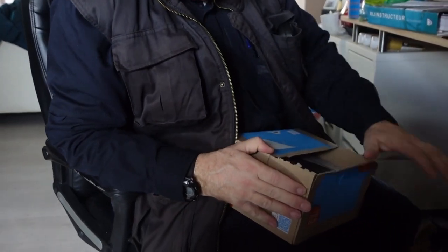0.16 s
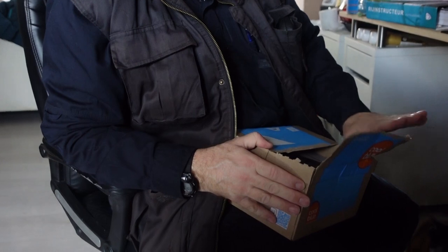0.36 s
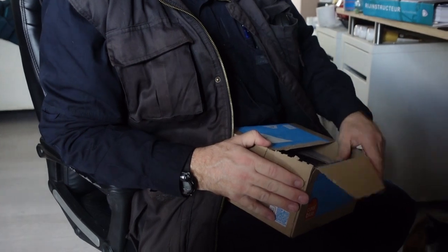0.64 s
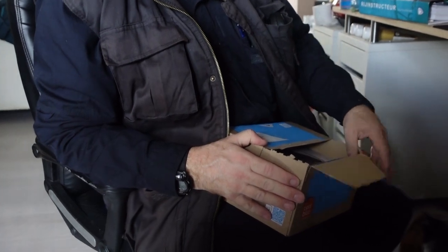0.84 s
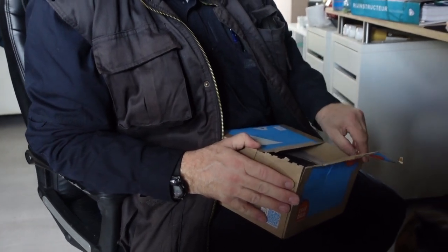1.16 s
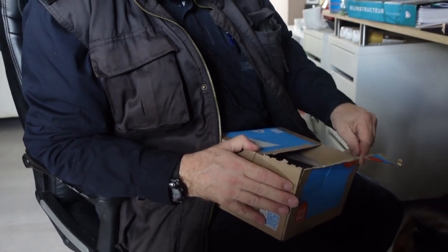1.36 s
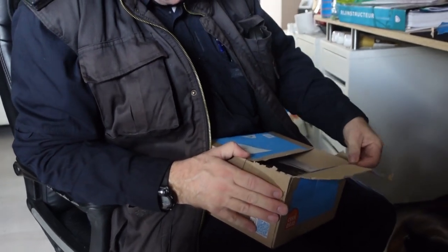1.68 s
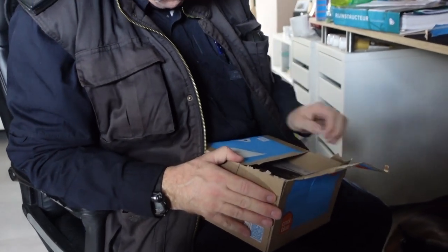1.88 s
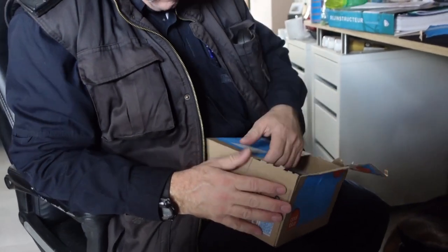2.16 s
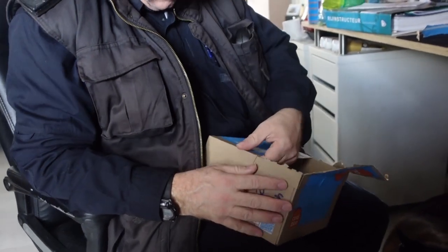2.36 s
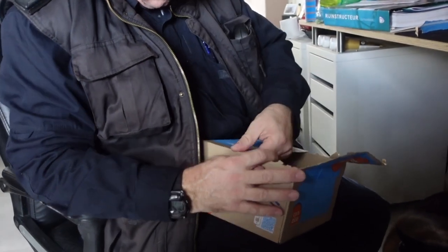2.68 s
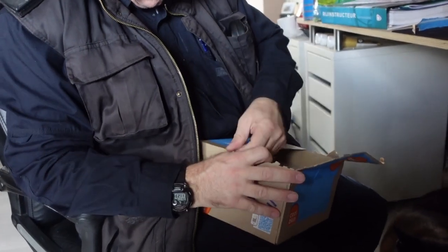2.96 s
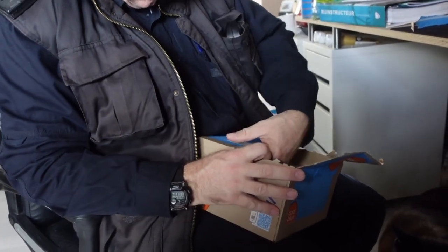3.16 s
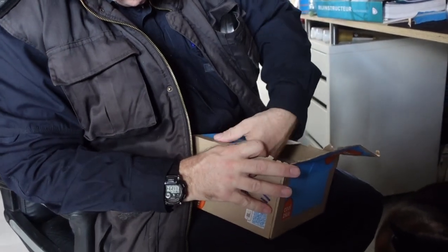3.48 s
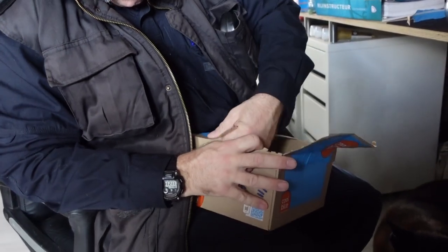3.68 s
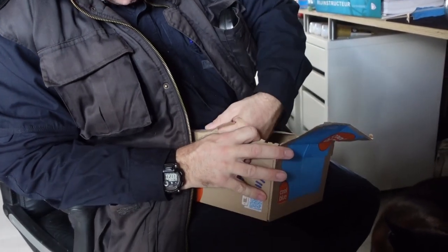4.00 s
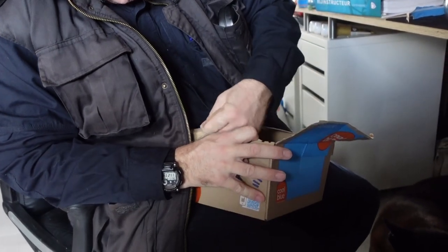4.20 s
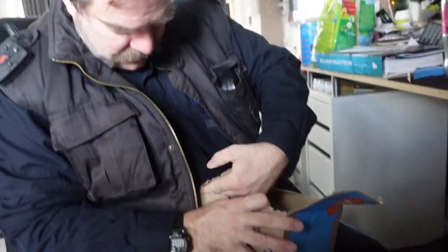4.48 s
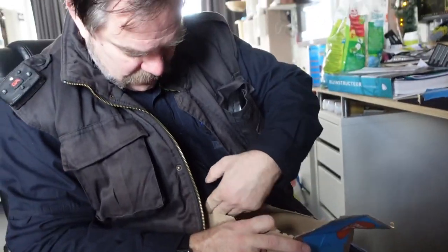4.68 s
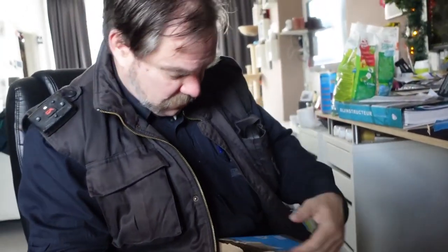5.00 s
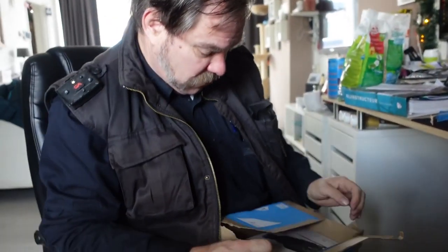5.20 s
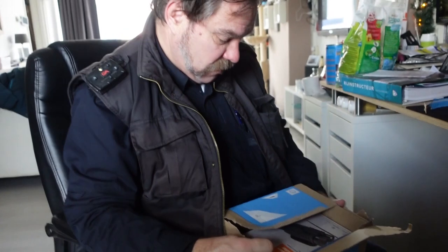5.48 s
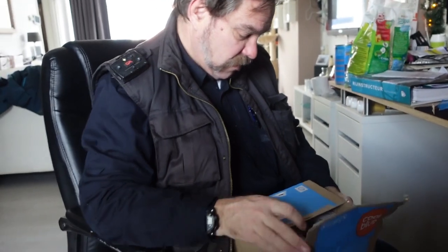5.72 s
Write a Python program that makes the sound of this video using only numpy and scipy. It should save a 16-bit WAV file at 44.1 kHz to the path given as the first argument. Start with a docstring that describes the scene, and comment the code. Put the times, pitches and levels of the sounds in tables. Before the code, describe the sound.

Close stereo sound of stiff cardboard being opened by hand indoors. Irregular papery rubs come and go, broken by bright flap snaps, short edge rasps, fine fibre crackles and muffled hollow thuds. The strongest hits come just before halfway and again about two thirds through, followed by gentler scuffing. The box sits slightly right of centre, with little echo and a faint steady room hiss.

```python
"""A cardboard box is opened on the lap in a small furnished room, close to a stereo microphone.
Over faint room air, hands and sleeves rub the board from the start, and edges soon rasp past each other.
Tiny fibres tick and soft bumps sound the hollow from about 0.3 s; flaps snap and knock from 0.6 s.
Rubs are trains of random slips, blows are bursts of noise; filters ring them as panels and hollow."""
import sys
import numpy as np
from scipy import signal
from scipy.fft import rfft, irfft
from scipy.io import wavfile
from scipy.ndimage import uniform_filter1d, minimum_filter1d

SR = 44100
rng = np.random.default_rng(int(sys.argv[2]) if len(sys.argv) > 2 else 0)


def file_out(sig):
    """Save sig as 16-bit WAV at sys.argv[1]."""
    # one column per channel
    cols = np.atleast_2d(sig).T
    # limit, then scale
    lim = np.clip(cols, -1, 1)
    pcm = np.round(lim * 32767).astype(np.int16)
    wavfile.write(sys.argv[1], SR, pcm)


N = 257984
TIME = np.arange(N) / SR  # seconds


def undb(db):
    """Decibels to amplitude gain."""
    return 10 ** (np.asarray(db) / 20)


def unit(x):
    """Scale to unit energy."""
    return x / np.sqrt(np.sum(x ** 2) + 1e-18)


def through(x, response):
    """Pass a sound through an impulse response."""
    return signal.fftconvolve(x, response)[:len(x)]


def add(track, start_s, sound):
    """Mix a sound into the track from a given time."""
    i = max(int(start_s * SR), 0)
    track[i:i + len(sound)] += sound[:max(N - i, 0)]


def colour(points, modes=(), size=4096):
    """Minimum-phase, unit-energy response: a broad (Hz, dB) shape with (Hz, width Hz, dB) resonances."""
    f = np.fft.rfftfreq(size, 1 / SR) + 1  # the 1 Hz offset keeps the logarithm finite
    hz, db = np.transpose(points)
    gain = undb(np.interp(np.log(f), np.log(hz), db))
    resonant_power = sum(undb(2 * mode_db) / (1 + (2 * (f - centre) / width) ** 2)
                         for centre, width, mode_db in modes)
    gain = gain * np.sqrt(1 + resonant_power)
    # folding the cepstrum forward puts the energy as early as it can be
    cepstrum = irfft(np.log(gain))
    cepstrum[1:size // 2] *= 2
    cepstrum[size // 2 + 1:] = 0
    return unit(irfft(np.exp(rfft(cepstrum))))


def judder(per_s):
    """Random wobble with a spread near 1: straight lines between normal draws."""
    knots = rng.standard_normal(N // 20)
    return np.interp(TIME * per_s, np.arange(len(knots)), knots)


def wander(x, per_s, ring_s, count=6):
    """Drift between short, dense rings, so the colour shifts but favours no pitch for long."""
    t = TIME[:2048]
    weights = np.array([np.exp(judder(per_s)) for _ in range(count)])
    weights /= np.sqrt(np.sum(weights ** 2, axis=0))
    decay = np.exp(-np.log(1000) * t / ring_s)  # 60 dB down after ring_s
    rings = rfft(rng.standard_normal((count, len(t))) * decay)
    # level the rings' average power at every frequency
    rings /= np.sqrt(np.mean(np.abs(rings) ** 2, axis=0))
    return sum(through(x * weight, ring) for weight, ring in zip(weights, irfft(rings)))


def slips(per_s, spread_db):
    """Stick-slip force: random small releases with a few large ones among them, local rms near 1."""
    size = undb(spread_db * np.minimum(rng.exponential(size=N), 6))
    force = (rng.random(N) < per_s / SR) * size * rng.choice([-1, 1], N)
    local_power = np.abs(uniform_filter1d(force ** 2, size=2048))
    return force / np.sqrt(local_power + 1e-9)


# Resonances of the box. Each row: frequency in Hz, width in Hz, level in dB over the broad response.
BOX_MODES = [(273, 31, -10), (420, 25, 1), (487, 18, -14.5), (649, 72, 4.5), (960, 110, -1),
             (1320, 17, -23.5), (1412, 9.3, 4.5), (1640, 57, -23.5), (2010, 61, -15), (2370, 67, -5),
             (2990, 100, 8), (3350, 79, 5.5), (3340, 60, 3), (3920, 330, 1.5), (5340, 200, 3),
             (5900, 140, -17), (6600, 210, -4)]


def board(ring_hz, hollow_db, clack_db, edge_db, ring_db=9):
    """Response of the box to one contact: the touched flap rings; the spot weights each register."""
    low = [(30, hollow_db - 48), (110, hollow_db - 22), (200, hollow_db - 19), (320, hollow_db),
           (540, hollow_db - 2.0), (790, hollow_db / 2 - 4)]
    middle = [(1280, 3.2), (1950, 3.7), (3200, clack_db), (4600, clack_db - 1.0)]
    high = [(7000, edge_db + 6.5), (11000, edge_db + 2.0), (16000, edge_db - 11.5)]
    ring_width_hz = 0.13 * ring_hz
    return colour(low + middle + high, list(BOX_MODES) + [(ring_hz, ring_width_hz, ring_db)])


def blow(response, db, crush, contact_s):
    """One contact: a sharp release, then a brief crush of the flutes, levelled as rms over 10 ms."""
    t = TIME[:4096]
    force = crush * unit(rng.standard_normal(len(t)) * np.exp(-t / max(contact_s, 1e-4)))
    force[0] += 1
    return unit(through(force, response)) * undb(db) * np.sqrt(SR / 100)


# Spectrum of the still room. Each row: frequency in Hz, relative level in dB per Hz.
AIR_SPECTRUM = [(25, -29), (130, -15), (300, -11.5), (1000, -3), (1600, 3), (2900, 0.5), (5000, -5.5),
                (9000, -9), (16000, -34)]


def air(level_db=-53):
    """Faint steady background of the room: shaped noise."""
    return undb(level_db) * through(rng.standard_normal(N), colour(AIR_SPECTRUM))


# Strokes of a hand, sleeve or flap over the board. Each row: fastest moment in seconds, swell in seconds,
# fade in seconds, panel level in dB, hollow in dB and dry hiss in dB, both relative to that level;
# rubbing() trims the voices afterwards.
STROKES = [(0.005, 0.055, 0.054, -32, -18, -3), (0.25, 0.31, 0.32, -47, -21, -2),
           (0.55, 0.058, 0.038, -41.5, -1.5, -2), (0.69, 0.054, 0.15, -35.5, -17.5, 1),
           (0.82, 0.049, .07, -36.5, -17.5, -4), (0.949, 0.1, 0.082, -36, -17, -5),
           (1.34, 0.031, 0.18, -45.5, -11, -1.5), (1.59, 0.1, 0.09, -42.5, -14, 2.5),
           (1.8, .05, 0.045, -55, -25, 5), (2.22, 0.045, 0.049, -40, -16, -5.5),
           (2.3, 0.087, 0.093, -39, -5.5, -4), (2.61, 0.081, 0.098, -40.5, -3, -2),
           (2.75, 0.1, 0.16, -45.5, 1, -2), (3.12, 0.023, 0.03, -37, -2.5, -1.5),
           (3.23, 0.081, 0.05, -44, -9, -3.5), (3.42, 0.059, 0.054, -43.5, -9.5, -3),
           (3.635, 0.014, 0.016, -40, -11.5, -2), (3.72, 0.058, 0.054, -42.5, -22, 5.5),
           (3.85, 0.063, 0.062, -44.5, -10.5, 5), (4.04, .07, .08, -59.5, -24, 9.5),
           (4.185, 0.043, 0.054, -33.5, -18.5, 3), (4.31, 0.048, 0.062, -31, -16, -0.5),
           (4.59, 0.13, 0.25, -47.5, -5, -6.5), (4.735, 0.066, 0.084, -37.5, -10, -5.5),
           (5.021, 0.077, 0.067, -33.5, -15, -3), (5.22, .04, 0.037, -39, 4, 3),
           (5.43, 0.18, 0.16, -42.5, -11.5, 1.5), (5.78, 0.13, 0.34, -42.5, -12, -7)]
# The holding hand never lies quite still. One row: level in dB, then hollow and dry hiss in dB relative to it.
GRIP = (-55, -8, -1.6)


def effort(drop_db=9, roundness=1.7):
    """Strokes swell and fade over the steady grip; gives the drive of panels, hollow and hiss."""
    def voice_power(db, hollow_db, hiss_db):
        """Power of panels, hollow and hiss, one row each."""
        return undb(db + np.array([[0], [hollow_db], [hiss_db]])) ** 2

    power = voice_power(*GRIP)
    for peak_s, swell_s, fade_s, *levels in STROKES:
        away = np.minimum(np.abs(TIME - peak_s) / np.where(TIME < peak_s, swell_s, fade_s), 10)
        # drop_db is the fall over one swell or fade time; roundness 1 is pointed, 2 a bell
        swell = undb(-drop_db * away ** roundness)
        power = power + voice_power(*levels) * swell ** 2
    return np.sqrt(power)


# How unevenly the surfaces catch. Each row: time in seconds, spread of slip sizes in dB.
CATCH = [(0, 3.5), (.55, 0.5), (.7, 4.5), (.95, 1.5), (3.5, 1.5), (3.7, 5), (4.3, 4), (4.6, 2.5),
         (5.85, -0.5)]
# Rubbed board, the hollow's voice. Each row: frequency in Hz, relative level in dB.
HOLLOW_SHAPE = [(30, -29), (100, -22), (170, -10.5), (310, 3.5), (420, 2), (700, -6), (1100, 3.5),
                (3000, -51)]
# Rubbed board, the panels' voice. Each row: frequency in Hz, relative level in dB.
PANEL_SHAPE = [(300, -23.5), (650, -16), (1000, -8), (1400, 2), (1750, 3), (2200, 4.5), (2800, 3),
               (4200, 2.5), (6500, -9), (14000, -47)]
# Rubbed board, the paper face's hiss. Each row: frequency in Hz, relative level in dB.
HISS_SHAPE = [(200, -68), (2000, -31), (4200, 1.5), (5600, 7.5), (8500, 4.5), (12000, -2), (16000, -9)]


def rubbing(depth_db=1.72, hollow_trim_db=-2.5, panel_trim_db=1.0, damping_db=-5):
    """Sliding contact: slips shake the hollow and the panels, finer ones hiss off the paper face."""
    on_panel, on_hollow, on_face = effort() * undb(depth_db * judder(90))
    spread_db = np.interp(TIME, *np.transpose(CATCH))
    coarse, fine = slips(3000, spread_db), slips(9000, spread_db)
    # a hand lying on the board weakens its low resonances and stops the high ones
    damped = [(hz, width, mode_db + damping_db) for hz, width, mode_db in BOX_MODES if hz < 2100]
    # each spot that the hand travels over stirs its own panel modes
    hollow_force = slips(1500, 2.35) * on_hollow * undb(hollow_trim_db)
    hollow = through(wander(hollow_force, 14, 0.022), colour(HOLLOW_SHAPE, BOX_MODES))
    panel_force = coarse * on_panel * undb(panel_trim_db)
    panel = through(wander(panel_force, 20, 0.017, count=9), colour(PANEL_SHAPE, damped))
    hiss = through(fine * on_face, colour(HISS_SHAPE))
    return hollow + panel + hiss


# A flap or finger catches and drags. Each row: start in seconds, swell in seconds, fade in seconds,
# level in dB, flap ring in Hz, then hollow, clack and edge in dB relative to the panel tone.
DRAGS = [(0.019, 0.0041, 0.01, -31.5, 3520, -19, 1, 1), (0.369, 0.021, 0.0077, -31.5, 1310, -4, -2, -13.5),
         (0.426, .002, .006, -32, 1280, -17, 3, -11), (0.629, .003, 0.023, -31.5, 1260, -13, -16, -20),
         (0.939, .002, 0.011, -30, 1780, -36, -4, -24), (1.28, 0.01, 0.013, -26.5, 2110, -14, -0.5, -10.5),
         (1.343, .01, 0.0065, -33, 1400, -34, 2, -11), (1.39, .0065, 0.027, -24.5, 3350, -1.5, -2, -6.5),
         (1.807, .0065, 0.014, -40.5, 2440, -24, 4, -12), (2.241, 0.056, 0.033, -33, 840, -0.5, -15, -20),
         (2.828, 0.036, 0.0093, -35.5, 6500, -16, -4, -7), (2.881, 0.017, 0.038, -15, 5530, -8, -1, -6.5),
         (3.243, 0.0042, 0.013, -26.5, 1640, -5, 2, -15), (3.668, 0.027, 0.059, -33.5, 8600, -11, -2, 11),
         (3.822, .016, 0.014, -32, 6300, 2, 0, 3), (4.242, 0.0055, 0.022, -21.5, 1490, 1.5, 2.5, -3.5),
         (4.2842, 0.0045, 0.012, -18.5, 6000, 7, -1.5, -3.5), (4.3, 0.022, 0.0032, -13, 2230, -16, -1, -8),
         (4.298, 0.034, 0.028, -30, 405, -0.5, -8, -17), (5.189, 0.046, 0.017, -31, 386, -2, -11, -26),
         (5.689, .003, 0.028, -34.5, 2100, -5, -8, -19), (5.731, 0.0056, 0.018, -35, 1570, -5.5, -18, -26)]


def drags(lead_db=9):
    """An edge rasps over its neighbour: the force swells, then dies as the flap comes free."""
    out = np.zeros(N)
    rasp = slips(7000, 2.07) * undb(0.45 * judder(300))
    for start_s, swell_s, fade_s, db, *tone in DRAGS:
        first = int(start_s * SR)
        span = slice(first, first + SR // 2)
        t = TIME[span] - start_s
        swell = undb(lead_db * np.minimum(t / swell_s - 1, 0))  # climbs by lead_db
        fade = np.exp(-np.maximum(t - swell_s, 0) / fade_s)
        add(out, start_s, through(rasp[span] * swell * fade, board(*tone)) * undb(db))
    return out


# Fibres cracking. Each row: start in seconds, level in dB, pitch in Hz.
CRACKS = [(0.2587, -32.5, 8300), (0.287, -44, 12800), (0.299, -35, 7800), (0.4737, -41, 7300),
          (0.4956, -31.5, 7660), (0.5798, -37, 10900), (0.5837, -39, 10100), (2.335, -37.5, 7400),
          (3.6323, -34.5, 5600), (3.6442, -38, 7700), (3.724, -34, 8500), (3.7441, -35, 8700),
          (3.775, -38, 7700), (3.793, -32, 7840), (3.8108, -31, 7960), (3.836, -28.5, 7000),
          (3.8396, -29.5, 7800), (4.0196, -42, 9700), (4.026, -44, 9050)]
# A fold is under strain and sheds fainter cracks. Each row: start in seconds, end in seconds.
STRAINS = [(0.311, 0.37), (3.68, 3.96)]


def cracks(splinter=0.61, splinter_s=0.00051, strain_per_s=35, strain_db=-44, scatter_db=5, strain_hz=8240):
    """Single fibres break with a bright tick that bypasses the box resonances."""
    faint = []
    for start_s, end_s in STRAINS:
        count = int((end_s - start_s) * strain_per_s) + 1
        for place, size in rng.random((count, 2)):
            crack_s = start_s + (end_s - start_s) * place
            faint.append((crack_s, strain_db + scatter_db * (2 * size - 1), strain_hz))
    out = np.zeros(N)
    for start_s, db, hz in list(CRACKS) + faint:
        shape = [(hz / 90, -52), (hz / 8, -27), (hz * 0.54, -15), (hz * 0.8, -1), (hz, 0), (hz * 1.65, -11)]
        add(out, start_s, blow(colour(shape), db, splinter, splinter_s))
    return out


# Soft bumps of fingers and knees, which mostly sound the hollow. Each row: start in seconds,
# level in dB, wall ring in Hz, contact time in seconds.
BUMPS = [(0.301, -49, 553, 0.0096), (2.161, -46.5, 940, 0.0012), (2.677, -38, 930, 0.0025),
         (4.172, -42.5, 350, .012), (4.2, -41, 353, .012), (4.528, -49, 470, 0.0088),
         (4.757, -43, 340, 0.0061), (4.807, -50.5, 420, .004), (4.986, -41, 423, .008),
         (5.12, -42, 430, 0.011), (5.356, -43.5, 620, 0.0067), (5.786, -45, 450, 0.0018)]


def bumps(crush=2.5, hollow_db=11, clack_db=-7, edge_db=-17):
    """Soft contacts share one dull balance of registers; only the wall ring differs in pitch."""
    out = np.zeros(N)
    for start_s, db, ring_hz, contact_s in BUMPS:
        response = board(ring_hz, hollow_db, clack_db, edge_db)
        add(out, start_s, blow(response, db, crush, contact_s))
    return out


# Flaps snapping and knocking. Each row: start in seconds, level in dB, flap ring in Hz, then hollow,
# clack and edge in dB relative to the panel tone, contact time in seconds.
KNOCKS = [(0.6111, -21.5, 1290, -11, -1, -15, 0.01), (0.6187, -21, 1420, -11, -10, -29, 0.0035),
          (0.6273, -21, 1065, -5.5, -5, -20.5, .007), (0.7293, -31.5, 4500, -21, 12, 4, 0.0018),
          (0.7606, -23, 1130, -11, -10.5, -19, 0.00061), (0.8298, -17, 1860, -17, 1, -11, 0.0025),
          (0.9035, -33, 2940, -20, 9, 0, 0.0009), (1.286, -28.5, 2220, -6, 1.5, -19, 0.0074),
          (1.3815, -16.5, 1950, -29, 3, -18, 0.002), (1.3845, -17, 1340, -17, -7, -15, 0.003),
          (1.3888, -18, 3340, -8, 4, -11, 0.0067), (2.5019, -21.5, 2970, -7, 2.5, 5.5, 0.0016),
          (2.5125, -27.5, 1780, -3, 3, -1, 0.0074), (2.8806, -10, 4460, -26, 0, -7.5, 0.0023),
          (3.5336, -41, 1590, -35, -4, -33, 0.0035), (4.152, -22, 2940, -7.5, 7, -4.5, .0024),
          (4.3047, -22, 2140, -4, -3, -17, 0.0023), (4.3202, -14, 2300, 0.5, 9, -11, 0.0037),
          (5.1733, -32.5, 4670, 0, -0.5, -8, .008), (5.8391, -25, 1580, -8, 4, -17, 0.0051)]


def knocks(crush=1.85):
    """Flaps snap free or strike the box and ring it."""
    out = np.zeros(N)
    for start_s, db, *tone, contact_s in KNOCKS:
        add(out, start_s, blow(board(*tone), db, crush, contact_s))
    return out


def radiate(x, corner_hz=125):
    """Small panels move too little air to give off deep bass."""
    return signal.sosfilt(signal.butter(2, corner_hz, "high", fs=SR, output="sos"), x)


def reflections(t60_s, gap_s):
    """Scattered echoes from body, desk and walls: decaying noise after a short gap."""
    t = TIME[:SR // 2]
    echoes = rng.standard_normal(len(t)) * undb(-60 * t / t60_s) * (t > gap_s)
    tone = colour([(100, 4.0), (1500, 1.0), (5000, -2.0), (9000, -1), (16000, 1)])
    return unit(through(echoes, tone))


def rumble(level_db=-90):
    """A very faint low rumble: noise weighted to the bass."""
    shape = colour([(25, 13), (80, 6), (300, -20), (2000, -50)])
    return undb(level_db) * through(rng.standard_normal(N), shape)


def scene(near_db=-15, room_db=-12.5, side_db=-19, side_room_db=-20):
    """The box sits a little right, near centre around 3.8 s; moving arms and room blur each contact."""
    box = radiate(rubbing() + drags() + cracks() + bumps() + knocks())
    mid = box + undb(near_db) * wander(box, 5.2, 0.039)
    mid += undb(room_db) * through(box, reflections(0.35, 0.006)) + air()
    side = undb(side_db) * wander(box, 5.5, 0.006)
    side += undb(side_room_db) * through(box, reflections(0.24, 0.006)) + 0.58 * air()
    # sound reaches the two microphone ports a fraction of a sample apart, which widens the treble
    side += 0.11 * np.gradient(mid)
    # the rumble differs between the ports
    side += rumble()
    pan_db = np.interp(TIME, [0, 2, 3.8, 5.8], [-1.5, -1.6, 0.18, -2.0])  # left over right
    return np.array([(mid + side) * undb(pan_db / 2), (mid - side) * undb(-pan_db / 2)])


def record(dry, top_hz=16000, ceiling=0.98):
    """The top is cut, and a fast limiter holds the hardest snaps under full scale."""
    x = signal.sosfilt(signal.ellip(10, 0.2, 80, top_hz, fs=SR, output="sos"), dry)
    gain = np.minimum(1, ceiling / (np.abs(x).max(axis=0) + 1e-9))
    # hold the lowest gain around each peak, then smooth it, 65 samples each
    return x * uniform_filter1d(minimum_filter1d(gain, size=65), size=65)


dry = scene()
out = record(dry)
file_out(out)
```